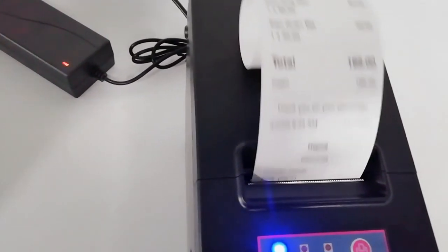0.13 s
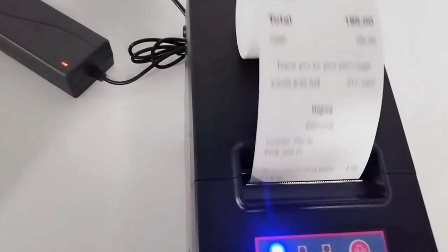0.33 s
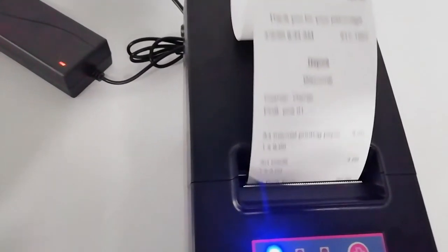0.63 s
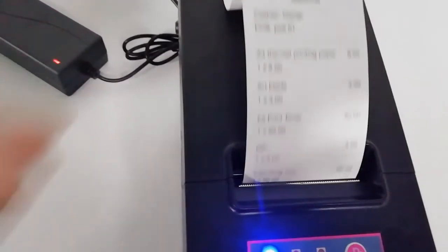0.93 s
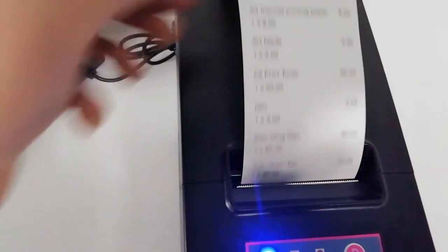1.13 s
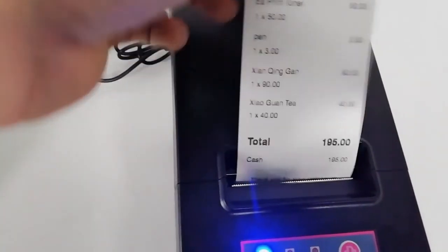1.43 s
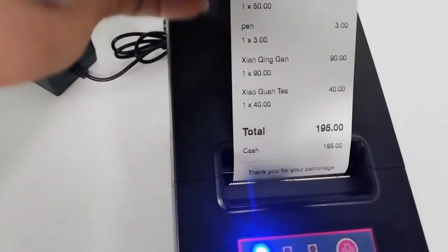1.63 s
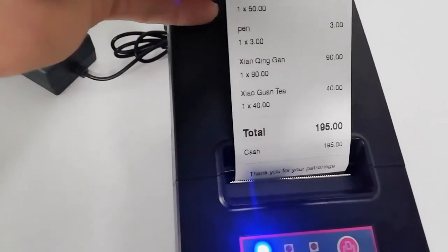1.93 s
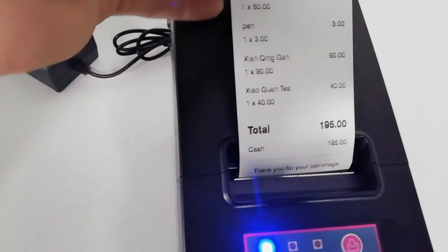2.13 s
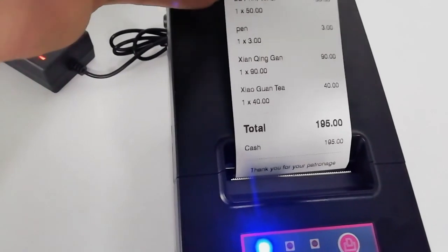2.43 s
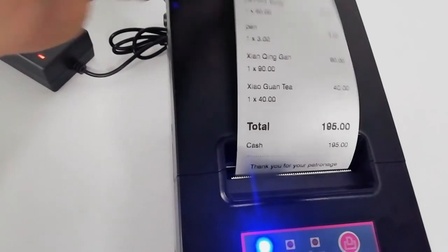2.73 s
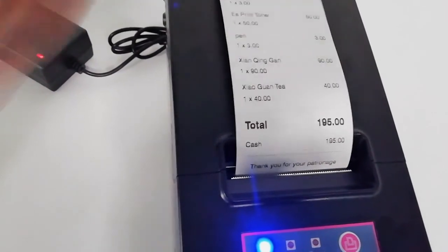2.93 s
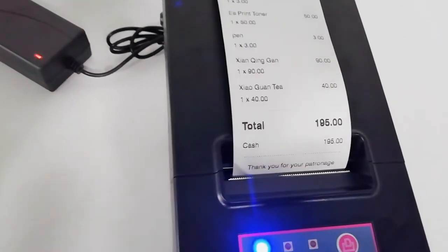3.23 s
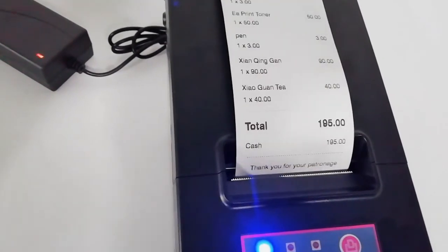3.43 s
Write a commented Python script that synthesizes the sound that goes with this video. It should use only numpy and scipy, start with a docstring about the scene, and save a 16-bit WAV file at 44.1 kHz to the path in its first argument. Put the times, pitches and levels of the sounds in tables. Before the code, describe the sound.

Small printer feeding paper with a buzzing whine, followed by soft paper rustles and clicks.

```python
"""A small room with a low rumble; one microphone close to a receipt printer on a table.
The printer feeds out paper: its stepper motor whines, the gears buzz, each step rattles the plastic
case and shakes the strip, and the strip hisses through the slot. The motor stops at 1.4 s and gives
one short extra feed. Fingers then slide along the strip and let it go with a snap at 2.8 s.
Jerks and tugs make the case ring."""
import sys
import numpy as np
from scipy import signal
from scipy.fft import rfft, irfft
from scipy.io import wavfile

SR = 44100
rng = np.random.default_rng(int(sys.argv[2]) if len(sys.argv) > 2 else 0)


def output_pcm(signal):
    """Save a mono or channel-first signal as 16-bit PCM at the path in sys.argv[1].

    Samples are clipped to [-1, 1] before scaling.
    """
    pcm = np.clip(np.atleast_2d(signal).T, -1, 1) * 32767
    wavfile.write(sys.argv[1], SR, np.round(pcm).astype(np.int16))


N = 158760
TIME = np.arange(N) / SR
# stages of the feed as the strip grows: start, early, midway, end (t/s)
STAGES_S = [0, .33, .8, 1.4]


def amp(db):
    """Decibels to gain."""
    return 10 ** (np.asarray(db) / 20)


def unit(x):
    """Scales to rms 1."""
    return x / np.sqrt(np.mean(x ** 2) + 1e-20)


def level(points):
    """A curve of (t/s, level/dB) points as gain."""
    return amp(np.interp(TIME, *np.transpose(points)))


def read(points, hz):
    """Reads a table on a log-frequency axis."""
    f, value = np.transpose(points)
    return np.interp(np.log(hz + 1), np.log(f + 1), value)


def colour(x, spectrum, shift=1):
    """Causal filter of unit energy with the given spectrum, its frequencies multiplied by shift."""
    size = 8192
    hz = abs(np.fft.fftfreq(size, 1 / SR))
    log_gain = np.log(amp(read(spectrum, hz / shift)))
    minimum_phase = np.exp(np.conj(signal.hilbert(log_gain)))
    taps = np.fft.ifft(minimum_phase).real[:size // 2]
    return signal.fftconvolve(x, taps / np.linalg.norm(taps))[:len(x)]


def wander(hz):
    """Random motion of rms 1, mostly slower than hz."""
    f = np.fft.rfftfreq(N, 1 / SR)
    return unit(irfft(rfft(rng.standard_normal(N)) / (1 + (f / hz) ** 2), N))


def gate(start, stop, rise, fall):
    """Linear attack, hold, exponential release; all in seconds."""
    return np.clip((TIME - start) / rise, 0, 1) * np.exp(-np.maximum(TIME - stop, 0) / fall)


def ring(x, hz, width_hz):
    """A resonance of the paper strip, of unit energy."""
    t = np.arange(SR // 50) / SR
    response = t * np.exp(-np.pi * width_hz * t) * np.sin(2 * np.pi * hz * t)
    return signal.fftconvolve(x, response / np.linalg.norm(response))[:N]


def friction(grains_per_s=2000, spread_db=2, grain_share=0.42):
    """Paper fibres catching: small clicks of uneven size in a fine hiss."""
    clicks = (rng.random(N) < grains_per_s / SR) * rng.choice([-1, 1], N)
    grains = unit(clicks * amp(spread_db * np.minimum(rng.exponential(1, N), 5)))
    return np.sqrt(grain_share) * grains + np.sqrt(1 - grain_share) * rng.standard_normal(N)


def drive_tone(travel, hz, phase, shaft_hz=32.83):
    """One partial of the drive; it flutters and pulses with the shaft, more so the higher it is."""
    flutter = 0.29 * (wander(hz=69) + 1j * wander(hz=69))
    shaft = 0.086 * np.sin(2 * np.pi * shaft_hz * travel)
    modulation = 1 + (flutter + shaft) * np.sqrt(hz / 2000)
    return np.sqrt(2) * (modulation * np.exp(2j * np.pi * hz * travel + 1j * phase)).real


def stepper_whine(travel, step_hz):
    """The motor sings at multiples of its step rate; their balance changes as the strip grows."""
    # step harmonics (multiple, level/dB at each of the four stages)
    harmonics = [(1, -53, -53, -52, -51.5), (2, -63.5, -63.5, -62.5, -63), (3, -63, -62, -61, -59),
                 (4, -60, -59.5, -60.5, -60.5), (5, -50, -50.5, -53, -56), (6, -57, -58, -59.5, -61.5),
                 (7, -62, -54.5, -58, -63), (8, -65, -65, -66, -65), (9, -65, -65, -65, -60),
                 (10, -71, -69, -70, -69)]
    return sum(amp(np.interp(TIME, STAGES_S, dbs))
               * drive_tone(travel, k * step_hz, phase=0.85 * rng.standard_normal())
               for k, *dbs in harmonics)


def gear_buzz(travel, mesh_hz=382.25):
    """The gear teeth buzz at multiples of the rate at which they mesh."""
    # mesh harmonics (multiple, level/dB)
    harmonics = [(2, -66), (3, -62.5), (4, -58), (6, -62), (8, -82)]
    return sum(amp(db) * drive_tone(travel, k * mesh_hz, phase=2 * np.pi * rng.random())
               for k, db in harmonics)


def case_rattle(blows):
    """Every step rattles the mechanism, heard through the plastic case."""
    # rattle spectrum (f/Hz, level/dB)
    spectrum = [(150, -21), (300, -6), (460, -3.5), (580, -8), (800, -4), (940, -12.5), (1200, -3),
                (1370, -14), (1560, -3), (1800, -5), (2090, 2), (2330, -14.5), (2480, 0.5), (2650, -8.5),
                (2880, -3), (3180, -20.5), (3450, -2.5), (3820, -13), (4000, -13), (4400, -22.5),
                (7000, -21), (15000, -33)]
    # rattle strength (t/s, level/dB)
    strength = [(0, -46.5), (.4, -50.5), (.7, -50), (.9, -48.5), (1.2, -51), (1.35, -47.5), (1.42, -53),
                (1.54, -44)]
    return level(strength) * colour(unit(blows * rng.standard_normal(N)), spectrum)


def strip_buzz(blows):
    """The steps shake the strip, whose resonances trade strength as it grows."""
    # strip modes (f/Hz, relative level/dB at each of the four stages)
    modes = [(1340, -15, -14, -14, -0.5), (2190, 4.5, 1, -11, -7), (2890, -4, -2.5, 0.5, -5),
             (3700, -12, -2, -9, 0)]
    buzz = sum(amp(np.interp(TIME, STAGES_S, dbs))
               * ring(blows * rng.standard_normal(N), hz, width_hz=490)
               for hz, *dbs in modes)
    return amp(-54) * unit(buzz)


def slot_hiss():
    """The paper rubs through the slot with a bright, slightly uneven hiss."""
    # hiss spectrum (f/Hz, level/dB)
    spectrum = [(2500, -16.5), (4300, -11.5), (5200, -6.5), (6200, -4), (7300, 2), (8200, 0.5), (9200, -11),
                (11500, -21.5), (15500, -28.5)]
    # hiss strength (t/s, level/dB)
    strength = [(0, -51.5), (.5, -50.5), (.75, -50.5), (1.1, -50), (1.38, -48.5), (1.42, -62), (1.54, -51)]
    return level(strength) * colour(friction() * amp(0.99 * wander(hz=38.7)), spectrum)


def paper_feed(step_hz=414.1):
    """The motor runs twice, sagging in pitch as it stops; returns the feed's tones and its noise."""
    # motor runs (start/s, stop/s, level/dB)
    runs = [(-.05, 1.412, 0.5), (1.496, 1.539, -5.5)]
    gates = [gate(start, stop, rise=0.00806, fall=0.011) for start, stop, _ in runs]
    running = sum(amp(db) * on for (_, _, db), on in zip(runs, gates))
    speed = (0.85 + 0.15 * sum(gates)) * (1 + 0.0007 * wander(hz=24.3))
    travel = np.cumsum(speed) / SR  # in seconds at full speed
    tones = stepper_whine(travel, step_hz) + gear_buzz(travel)
    steps = step_hz * travel
    step_gain = amp(0.2 * rng.standard_normal(N))[steps.astype(int)]
    blows = step_gain * np.exp(-(steps % 1) / 0.92)  # each fades to a third before the next
    noise = case_rattle(blows) + strip_buzz(blows) + slot_hiss()
    return running * tones, running * noise


def room_tone():
    """Steady room noise and a low rumble that is stronger during the feed."""
    # steady noise spectrum (f/Hz, level/dB)
    floor = [(12, -70), (20, -1), (70, -1.5), (213, -16), (238, -10.5), (324, -12), (452, -19),
             (686, -21.5), (1070, -27), (1270, -28), (1540, -29.5), (2090, -31), (4070, -39.5), (5850, -40),
             (15500, -46)]
    # rumble spectrum (f/Hz, level/dB)
    rumble = [(15, -13), (35, -2), (60, -4), (120, -10), (220, -16), (400, -41.5), (1000, -81)]
    # rumble strength (t/s, level/dB)
    strength = [(0, -49.5), (.28, -45), (.6, -49), (.85, -46.5), (1.1, -45.5), (1.4, -49.5), (1.7, -52.5),
                (1.9, -50.5)]
    steady = amp(-55) * unit(colour(rng.standard_normal(N), floor))
    return steady + level(strength) * colour(rng.standard_normal(N), rumble)


def paper_snaps(crack_s=0.00052, scatter_s=0.0075, scatter_db=-5.5):
    """The paper buckles with a short crack, scattered by the case and the table."""
    # snaps (t/s, level/dB)
    snaps = [(1.144, -52), (1.196, -36.5), (1.291, -36.5), (1.438, -38.5), (1.535, -47), (1.557, -56),
             (2.072, -55), (2.201, -54), (2.683, -41.5), (2.751, -49.5), (2.789, -56), (2.8, -31.5),
             (2.871, -46), (2.931, -53)]
    # crack spectrum (f/Hz, level/dB)
    spectrum = [(200, -29), (1200, -9), (2300, -8), (3200, -4), (4400, -5), (5500, -2), (7400, 6),
                (9200, -10), (12000, -17), (15500, -18)]
    force = np.zeros(N)
    for start, db in snaps:
        age = np.maximum(TIME - start, 0)
        decay = np.exp(-age / crack_s) + amp(scatter_db) * np.exp(-age / scatter_s)
        force += (TIME >= start) * amp(db) * decay
    return colour(force * rng.choice([-1, 1], N), spectrum)


def handling(feed_end_s=1.4):
    """The hanging strip brushes the case; fingers stroke it and it rings where it is held."""
    # spectrum of sliding paper (f/Hz, level/dB)
    rub = [(300, -17.5), (1500, -13.5), (2600, -14), (3300, -19), (4400, -18), (5700, -12.5), (6400, -9),
           (7400, 0), (8400, -2), (9200, -10.5), (10300, -13), (11800, -24), (15500, -23)]
    # faint brushing on the case (t/s, level/dB)
    brushing = [(1.4, -50.5), (1.72, -59), (1.86, -74.5), (2.04, -75), (2.3, -64), (2.76, -63),
                (2.92, -64.5), (3.05, -65), (3.22, -70.5), (3.35, -75.5), (3.51, -76), (3.6, -70)]
    # finger strokes (t/s, length/s, level/dB, change over the stroke/dB, spectrum shift ratio,
    # ring f/Hz, ring width/Hz, relative ring level/dB)
    strokes = [(1.428, 0.029, -43, -6, 1.08, 5140, 550, -5), (1.576, 0.13, -44, -6, 1.005, 5200, 600, -19),
               (1.706, .03, -54, -9, 0.89, 7450, 900, -19),
               (2.075, 0.041, -57.5, 2, 0.99, 4900, 400, -14.5),
               (2.191, .012, -54, -1, 0.98, 4230, 1000, -9),
               (2.221, 0.099, -59.5, -2.5, 0.99, 3630, 1500, -11.5),
               (2.309, 0.073, -58, 0.5, 1.036, 4160, 1600, -9),
               (2.44, 0.077, -57, -6.5, 1.06, 4340, 1400, -10),
               (2.52, 0.12, -57.5, 4.5, 1.03, 4470, 1570, -7),
               (2.629, 0.042, -61.5, 11.5, 0.98, 6960, 1190, 1.5),
               (2.676, 0.05, -50.5, -5.5, 1.01, 5700, 1000, -1.5),
               (2.776, 0.013, -51.5, 2, 0.95, 3350, 1200, -6),
               (2.802, 0.04, -56, 5.5, .94, 5430, 1000, -19),
               (2.852, 0.016, -52, 3.5, 0.94, 6740, 1200, -20)]
    out = colour(friction() * level(brushing) * (TIME > feed_end_s), rub)
    grain = friction() * amp(1.76 * wander(hz=45))
    for start, length, db, change_db, shift, ring_hz, width_hz, ring_db in strokes:
        contact = gate(start, start + length, rise=0.015, fall=0.0079)
        progress = np.clip((TIME - start) / length, 0, 1)
        force = grain * contact * amp(db + change_db * progress)
        out += colour(force, rub, shift) + amp(ring_db) * ring(force, ring_hz, width_hz)
    return out


def case_jolts(rise_s=0.0021, pivot_hz=480, detune=0.012):
    """Each jerk or tug rings the modes of the plastic case; a negative tilt makes a duller knock."""
    # jolts (t/s, level/dB, tilt/dB per octave)
    jolts = [(1.417, -35.5, 2), (1.437, -37.5, 6.5), (1.483, -38.5, 8), (1.502, -37, 4),
             (1.521, -34.5, 0.5), (1.537, -43, 4), (2.2, -51.5, 7), (2.801, -50.5, 2), (2.812, -40, -14),
             (2.841, -64, -1)]
    # case modes (f/Hz, level/dB, t60/s)
    modes = [(420.4, -5.5, 0.065), (479, -1.5, 0.056), (808, -6.5, 0.033), (1210, -13.5, 0.051),
             (1517, -12.5, 0.024), (2150, -20.5, 0.026)]
    out = np.zeros(N)
    t = np.arange(SR // 5) / SR
    attack = 1 - np.exp(-t / rise_s)
    for start, db, tilt_db in jolts:
        knock = np.zeros(len(t))
        for hz, mode_db, t60 in modes:
            decay = amp(mode_db + tilt_db * np.log2(hz / pivot_hz) - 60 * t / t60)
            detuned_hz = hz * (1 + detune * rng.standard_normal())
            knock += decay * np.sin(2 * np.pi * detuned_hz * t)
        part = out[round(start * SR):][:len(t)]
        part += (amp(db) * knock * attack)[:len(part)]
    return out


def room_reverb(x):
    """The small room adds a short diffuse tail, each band dying at its own speed."""
    # reverberation times (f/Hz, t60/s)
    decay_times = [(200, 0.49), (2000, 0.27), (7500, 0.15), (15000, 0.27)]
    hz, t, bands = signal.stft(rng.standard_normal(SR // 2), SR, nperseg=256)
    t60 = read(decay_times, hz)[:, None]
    tail = signal.istft(bands * amp(-60 * t / t60), SR)[1]
    return signal.fftconvolve(x, tail / np.linalg.norm(tail))[:N]


def scene():
    """Printer and paper close up, in mono; the tones stay dry, the rest spreads into the room."""
    tones, feed_noise = paper_feed()
    near = feed_noise + case_jolts() + handling() + paper_snaps()
    return (tones + near + amp(-11) * room_reverb(near) + room_tone())[None]


def record(dry):
    """The recorder cuts the treble steeply at 15.8 kHz."""
    lowpass = signal.firwin(1023, 15800, window=("kaiser", 9), fs=SR)
    return signal.oaconvolve(dry, lowpass[None], "same")


dry = scene()
out = record(dry)
output_pcm(out)
```